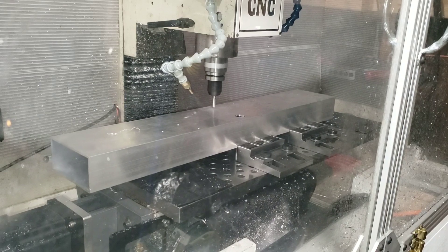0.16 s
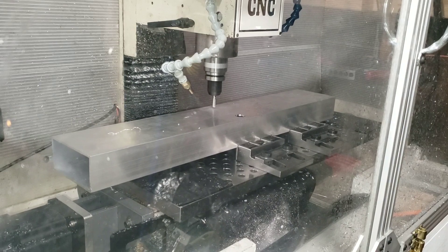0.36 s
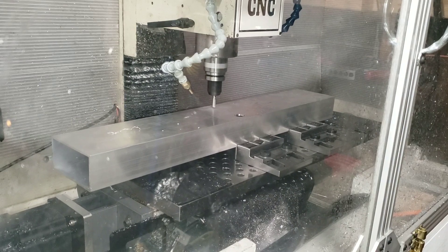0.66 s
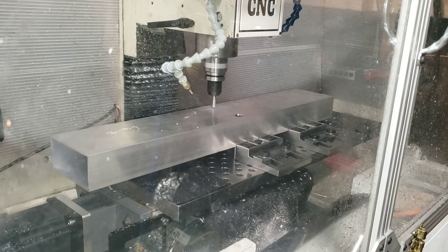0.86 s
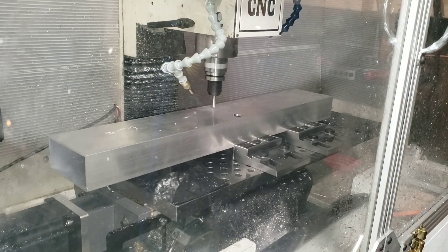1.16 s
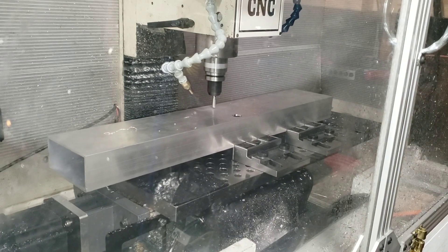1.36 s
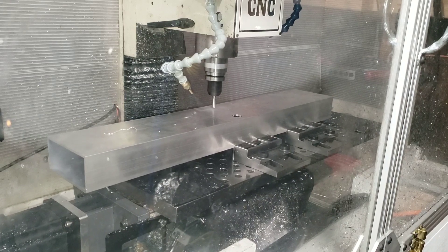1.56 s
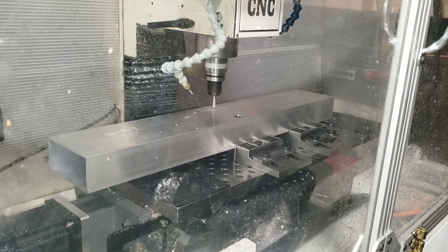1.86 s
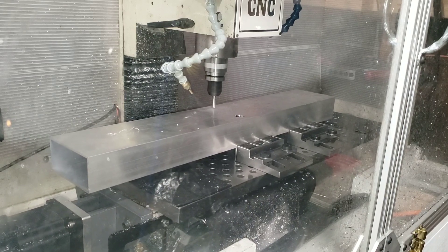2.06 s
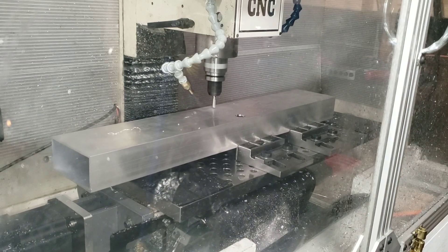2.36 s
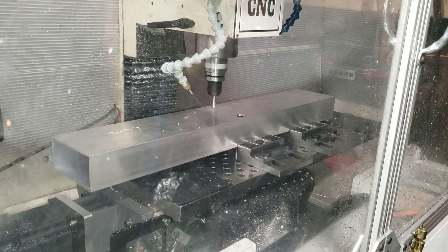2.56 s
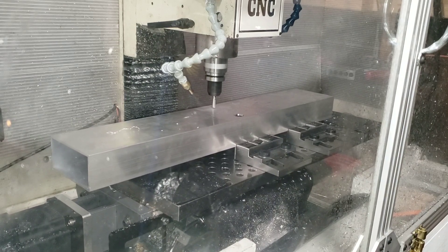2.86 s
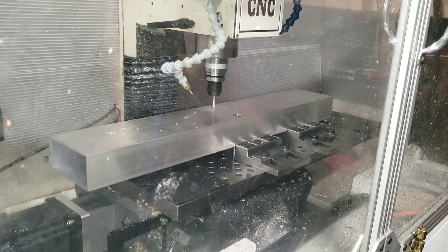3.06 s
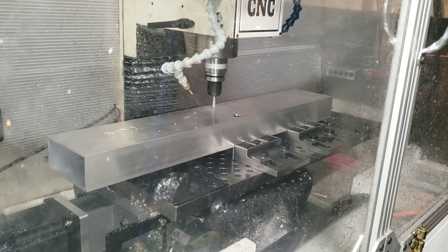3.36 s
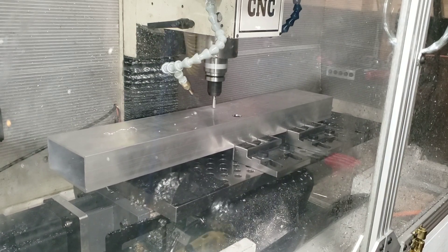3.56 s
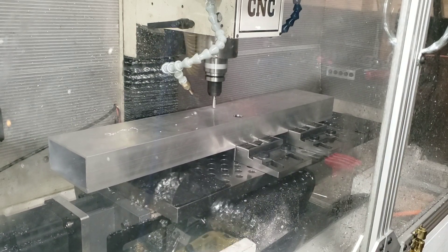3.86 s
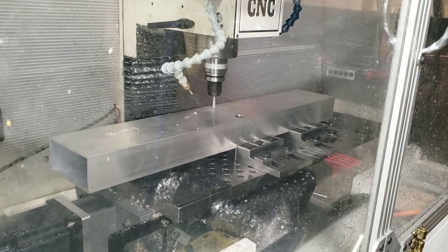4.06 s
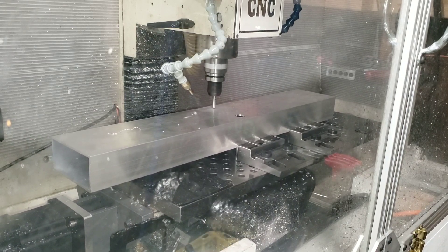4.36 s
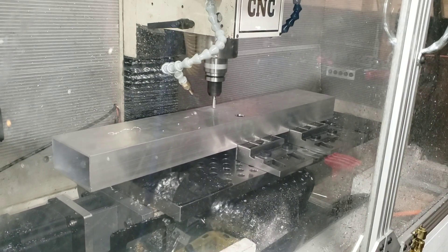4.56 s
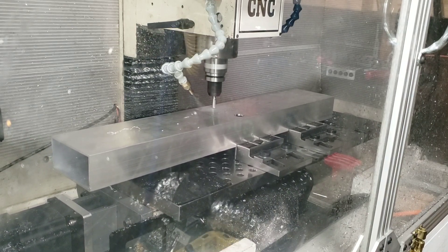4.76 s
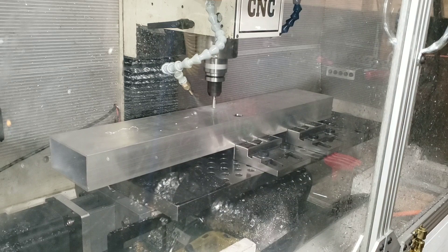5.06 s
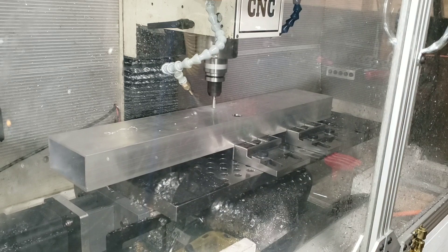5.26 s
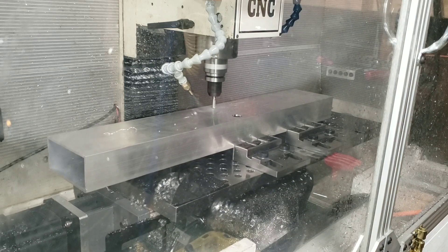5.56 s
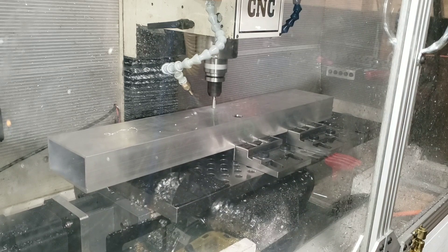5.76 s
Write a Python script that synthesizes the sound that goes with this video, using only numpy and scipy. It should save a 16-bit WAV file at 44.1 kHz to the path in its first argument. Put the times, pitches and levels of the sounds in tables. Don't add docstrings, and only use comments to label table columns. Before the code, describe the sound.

Inside a metal machine enclosure, a steady sharp air hiss covers a pulsing low hum, faint motor whine and quiet frame grunts.

```python
import sys
import numpy as np
from scipy import signal
from scipy.fft import rfft, irfft, next_fast_len
from scipy.io import wavfile
from scipy.ndimage import uniform_filter1d

SR = 44100
rng = np.random.default_rng(int(sys.argv[2]) if len(sys.argv) > 2 else 0)


def wav_out(sig):
    wavfile.write(sys.argv[1], SR, np.round(np.clip(np.atleast_2d(sig).T, -1, 1) * 32767).astype(np.int16))


def volts_from_db(level):
    exponent = np.asarray(level, float) / 20
    return 10 ** exponent


N = 260631
SIZE = next_fast_len(N)
LAP_S = 2.032


def curve(table, hz):
    at, value = np.transpose(table)
    return np.interp(np.log(np.maximum(hz, 1)), np.log(at), value)


def walk(rate):
    hold = int(SR / rate)
    levels = np.repeat(rng.standard_normal(N // hold + 1), hold)
    slewed = uniform_filter1d(uniform_filter1d(levels, hold), hold)[:N]
    return (slewed - slewed.mean()) / slewed.std()


def sides(lean_db):
    return volts_from_db(np.array([lean_db, -lean_db]) / 2)


def lap(t, peak_s):
    return np.cos(2 * np.pi * (t - peak_s) / LAP_S)


def shading_db(t):
    # (time [s], level [dB])
    shading = [
        (0.0, -29.5),
        (.25, -29.5),
        (.62, -27),
        (.78, -30),
        (.95, -31.5),
        (1.25, -35),
        (1.5, -31),
        (1.82, -29),
    ]
    return np.interp(t, *np.transpose(shading), period=LAP_S)


def air(colour, flicker_db, rate, count=10):
    # (frequency [Hz], share [-1..1])
    likeness = [(40, 0.97), (60, 1), (120, 0.14), (165, 1), (230, 0.77), (320, 0.92), (400, 0.9),
                (630, 0.63), (760, 0.37), (850, -1), (920, 0.12), (1500, 0.058), (9000, -0.023),
                (15000, -0.23)]
    # (frequency [Hz], left minus right [dB])
    lean = [(40, 4), (110, 7), (250, -1.5), (700, 2), (1300, 1), (4400, 2.5), (7500, 0), (11000, -3.5),
            (12800, -5), (13600, -3), (14300, -10), (14650, 10), (14900, -8), (15700, -4)]
    hz = np.maximum(np.arange(SIZE // 2 + 1) * SR / SIZE, 1)
    low_hz, high_hz = colour[0][0], colour[-1][0]
    same = np.clip(curve(likeness, hz), -1, 1)
    mid, side = rfft(rng.standard_normal((2, SIZE)))
    pair = np.sqrt(1 + same) * mid + np.sqrt(1 - same) * side * np.array([[1], [-1]])
    slope_db = -18 * np.abs(np.log2(np.clip(hz, low_hz, high_hz) / hz))
    pair = pair * volts_from_db(curve(colour, hz) + slope_db) * sides(curve(lean, hz))
    place = np.interp(np.log(hz), np.log([low_hz, high_hz]), [0, count - 1])
    out = 0
    for k in range(count):
        share = np.cos(np.pi / 2 * np.clip(place - k, -1, 1)) ** 2
        band = irfft(pair * share, SIZE)[:, :N]
        out = out + band * volts_from_db(flicker_db * walk(rate))
    return out / np.sqrt(np.mean(out ** 2))


def tone(t, hz, lean_db, lead, db, wander_db):
    phase = 2 * np.pi * (hz * t + rng.random()) + 0.13 * wander_db * walk(2.53)
    wave = np.sin(phase + np.array([[lead / 2], [-lead / 2]]))
    level = volts_from_db(db + wander_db * walk(8))
    return np.sqrt(2) * level * sides(lean_db + 0 * t) * wave


def ducts(t):
    # (frequency [Hz], density [dB per Hz])
    rumble = [(22, -23), (45, -16), (58, -7), (75, -10), (95, -3), (135, -2.5), (165, -8.5), (185, -13),
              (230, -22), (265, -21.5), (300, -25.5)]
    shade_db = shading_db(t) - shading_db(t).mean()
    return volts_from_db(-39 + 0.54 * shade_db) * air(rumble, 2.4, 7, count=7)


def panels(t):
    # (frequency [Hz], density [dB per Hz])
    buzz = [(255, -14), (300, 1.5), (350, -2), (500, -3.5), (640, -4.5), (800, -1), (850, -2.5),
            (900, -3.5), (1250, -5), (1550, -8.5), (1800, -18)]
    swing_db, peak_s, sag_db_per_s = 0.5, 1, 0.6
    level_db = -45 + swing_db * lap(t, peak_s) - sag_db_per_s * (t - t.mean())
    return volts_from_db(level_db) * air(buzz, 1.3, 9, count=6)


def fan(t):
    # (multiple of shaft rate, left minus right [dB], left leads [rad])
    multiples = [(12, 1, .1), (13, 1, -.2), (16, -2, .2), (20, -6, .7), (26, 3, -.1), (28, 6, .8),
                 (30, 0, 1.2), (32, 8, .3), (34, -2, 1.8), (38, -3, 2.6), (46, 1, 2.6), (48, 0, 1.5),
                 (50, 4, -2.6)]
    strengths = [-62, -60.5, -60, -66, -60.5, -61, -67, -63, -70, -61, -62, -60.5, -63]
    shaft_hz = 36.575
    out = 0
    for (k, lean_db, lead), db in zip(multiples, strengths):
        out = out + tone(t, k * shaft_hz, lean_db, lead, db, 1.6)
    return out


def spindle(t):
    # (frequency [Hz], left minus right [dB], left leads [rad])
    lines = [(74.8, 1, 0), (299.7, 0, 0), (333.1, -4, 0), (399.7, 0, 0), (443.4, 1, .2), (553.7, 4, .9),
             (666.4, -4, -.4), (799.4, 0, -2.5), (2333, 0, 1.5), (2767, 2, 1.5), (7333, -2, 1.8)]
    # (level [dB], wander [dB])
    strengths = [(-52, 1.5), (-63, 2.5), (-58, 3.5), (-50.5, 0.5), (-66, 1), (-62, 1), (-61.5, 3),
                 (-53.5, 0.8), (-59, 2), (-60, 2), (-52, 1)]
    return sum(tone(t, *place, *strength) for place, strength in zip(lines, strengths))


def pump(t):
    drone_hz, swing_rad, ahead_s = 110.19, 0.36, 0.24
    path_s = swing_rad * lap(t, ahead_s) / (2 * np.pi * drone_hz)
    return tone(t + path_s, drone_hz, 2.5, -0.042, shading_db(t), 0.3)


def frame(t):
    # (time [s], strength [dB], left minus right [dB])
    reversals = [
        (0.527, -31.5, -2),
        (0.899, -33, 0),
        (1.548, -36.5, 2),
        (1.906, -42.5, 8),
    ]
    mode_hz, rise_s, fall_s = 159.6, 0.043, 0.038
    out = 0
    for s, db, lean_db in reversals:
        since = (t - s + LAP_S / 2) % LAP_S - LAP_S / 2
        swell = np.exp(-(since / np.where(since < 0, rise_s, fall_s)) ** 2)
        out = out + volts_from_db(db) * sides(lean_db)[:, None] * swell * np.sin(2 * np.pi * mode_hz * since)
    return out


def enclosure(hiss):
    # (delay [ms], gain [ratio])
    echoes = [
        [(1.1, 0.078), (1.8, 0.06), (4.2, 0.26), (6.8, 0.11)],
        [(.85, 0.024), (1.5, 0.067), (2.4, 0.038), (3.9, 0.048)],
    ]
    t60_s, tail_db = 0.25, -11
    out = hiss.copy()
    for port, taps in enumerate(echoes):
        for ms, gain in taps:
            out[port] += gain * np.roll(hiss[port], int(ms * SR / 1000))
    tail = rng.standard_normal((2, 6000)) * volts_from_db(-60 * np.arange(6000) / SR / t60_s)
    tail[:, :int(0.006 * SR)] = 0
    tail *= volts_from_db(tail_db) / np.sqrt(np.sum(tail ** 2, axis=1, keepdims=True))
    fed = hiss + 0.55 * hiss[::-1]
    out += signal.fftconvolve(fed, tail, axes=1)[:, :N]
    return out


def nozzle(t):
    # (frequency [Hz], density [dB per Hz])
    jet = [(1100, -16.5), (1550, -6.5), (1750, -0.5), (2100, -2), (4500, -2), (7300, -0.5), (7900, -5),
           (8500, -13), (11000, -9)]
    # (frequency [Hz], density [dB per Hz])
    orifice = [(7500, -27), (9000, -16), (10500, -11.5), (11800, -2), (13000, -0.5), (14600, -1),
               (15000, 5), (15400, 8), (15750, 2)]
    jet_facing_s, orifice_facing_s, sag_db_per_s = 0.13, 1.5, 0.14
    jet_db = -34.5 + 0.64 * lap(t, jet_facing_s)
    orifice_db = -23 + 0.3 * lap(t, orifice_facing_s) - sag_db_per_s * t
    hiss = volts_from_db(jet_db) * air(jet, 0.4, 12) + volts_from_db(orifice_db) * air(orifice, 0.39, 14)
    out = enclosure(hiss)
    highpass = signal.butter(4, 12500, "high", fs=SR, output="sos")
    bright = signal.sosfilt(highpass, hiss[1])
    out[0] += 0.25 * np.roll(bright, 2)
    return out


def scene():
    t = np.arange(N) / SR
    return ducts(t) + panels(t) + fan(t) + spindle(t) + pump(t) + frame(t) + nozzle(t)


def band_limit(x):
    return signal.sosfilt(signal.butter(12, 15775, fs=SR, output="sos"), x)


def record(dry):
    return band_limit(dry)


dry = scene()
out = record(dry)
wav_out(out)
```